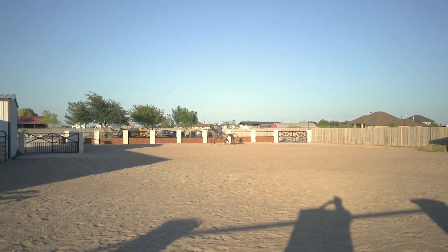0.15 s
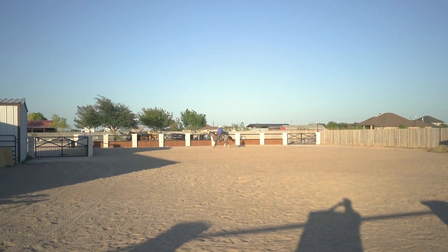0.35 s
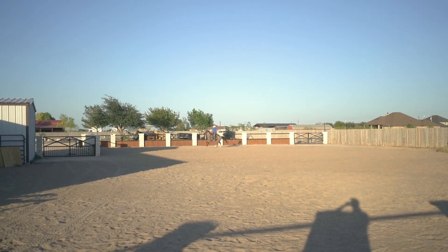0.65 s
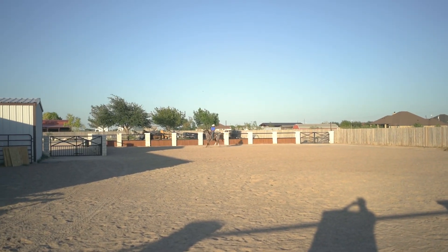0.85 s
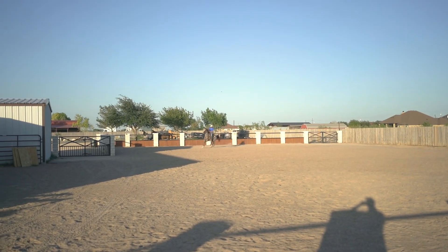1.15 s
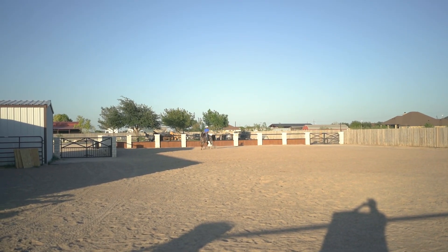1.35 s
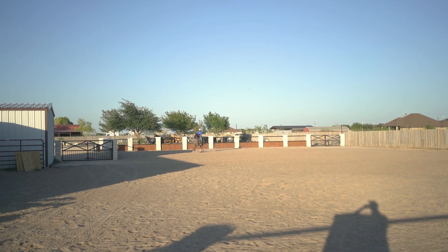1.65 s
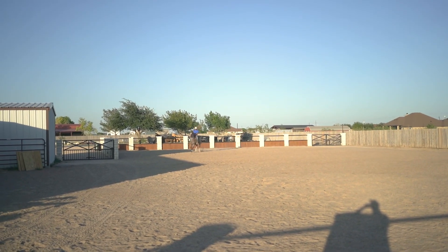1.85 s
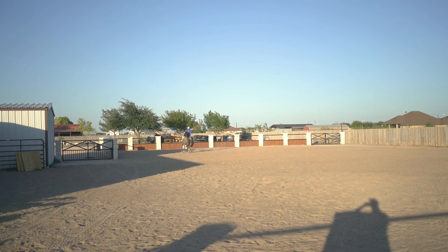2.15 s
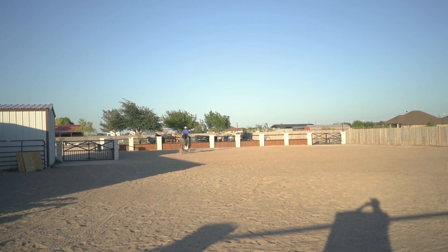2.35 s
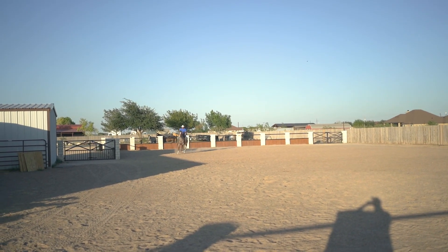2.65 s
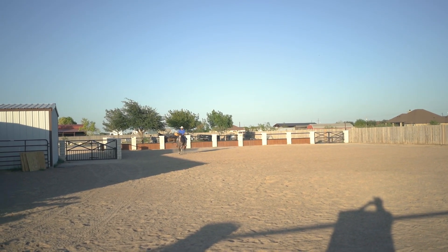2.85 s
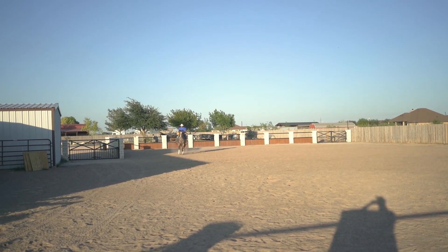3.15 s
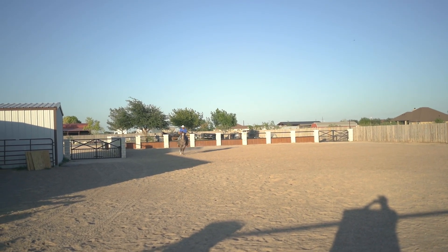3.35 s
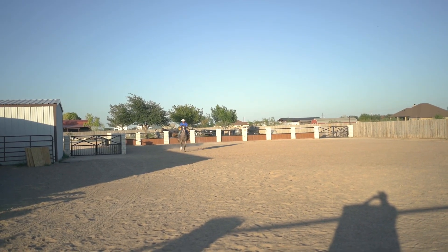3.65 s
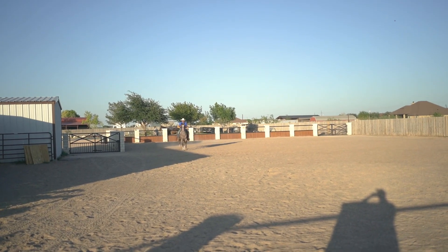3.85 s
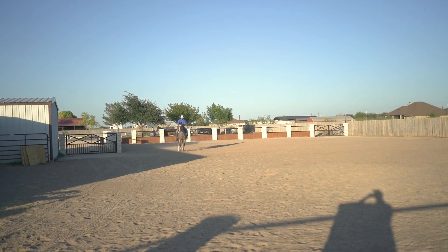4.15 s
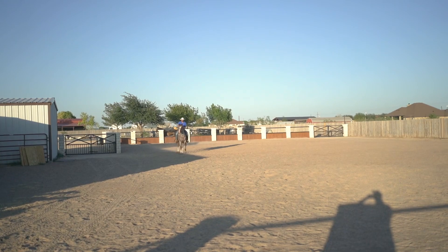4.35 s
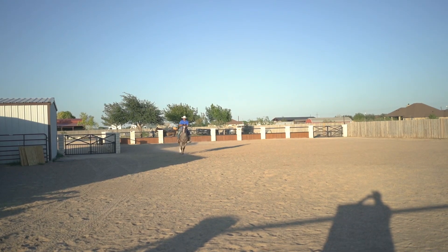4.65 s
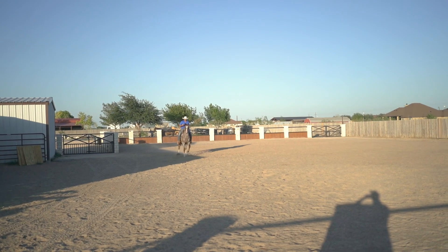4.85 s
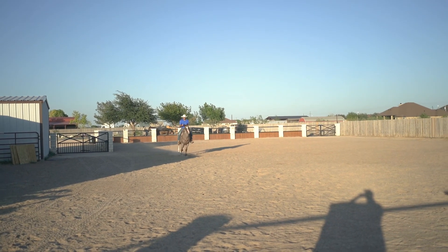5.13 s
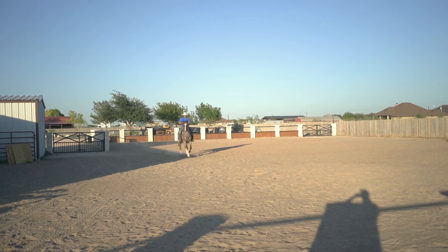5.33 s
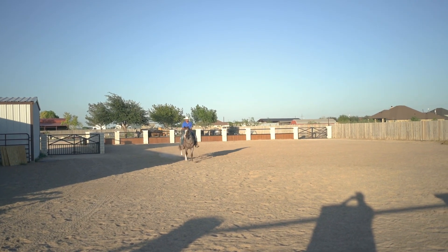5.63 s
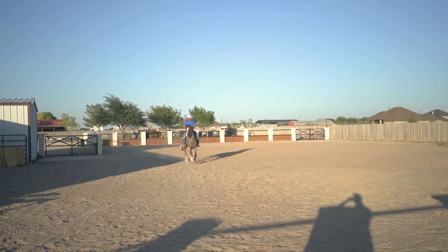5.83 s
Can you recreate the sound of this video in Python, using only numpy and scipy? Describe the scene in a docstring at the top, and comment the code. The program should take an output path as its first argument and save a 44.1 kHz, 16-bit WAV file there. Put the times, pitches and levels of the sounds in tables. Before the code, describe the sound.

Low wind buffets and moans at an outdoor microphone. A near horse starts with a hoarse grunt, rises into a piercing, shaky whinny, then adds a brief higher-pressure yelp and a weak puff of breath. After a windy pause a second horse farther off answers with a long throbbing neigh, high and low at once, sinking and fading. Short dull echoes follow the calls, with a few tiny dry ticks.

```python
"""Two horses calling in the wind

Wind buffets a microphone beside an open sand arena: shaped low noise, and a moan from a moving resonance.
A horse near by gives a long wavering whinny, a short one and a snort, built from unsteady tones and noisy breath.
A second horse answers from farther off with a high voice and a low one at once, and a thin strand between.
Sheds and fences return a short echo, made of fading noise. There is a faint outdoor hiss and a few dry ticks."""
import sys
import numpy as np
from scipy import signal
from scipy.fft import rfft, irfft
from scipy.io import wavfile
from scipy.ndimage import uniform_filter1d

SR = 44100
rng = np.random.default_rng(int(sys.argv[2]) if len(sys.argv) > 2 else 0)


def to_wav(s):
    """Save 16-bit WAV."""
    ch = np.atleast_2d(s).T  # columns
    pcm = np.round(np.clip(ch, -1, 1) * 32767)  # PCM
    wavfile.write(sys.argv[1], SR, pcm.astype(np.int16))


N = 264159  # length of the scene in samples, about 6 s

# how the far horse's throat colours its voices: (frequency [Hz], level [dB])
FAR_THROAT = [(250, -30), (500, -10.5), (760, -13.5), (1030, -10), (1450, 6), (1800, 0.5), (2150, -7.5),
              (2300, -12.5), (2420, -32.5), (2650, -10), (3000, -2.5), (3600, -9.5), (3780, -23.5),
              (4050, -12.5), (4350, -27.5), (4800, -28), (5300, -25.5), (6100, -30), (6500, -28),
              (7000, -30.5), (8300, -36), (15500, -47.5)]


def gain_of(db):
    """Turns decibels into a gain."""
    return 10 ** (np.asarray(db) / 20)


def evened(x):
    """Scales a sound to an average (rms) level of 1."""
    return x / np.sqrt(np.mean(x ** 2) + 1e-20)


def columns(rows):
    """Gives a gate that is open while the table lasts, then the table's columns at every sample."""
    s, *values = np.transpose(rows)
    t = np.arange(N) / SR
    gate = np.clip(np.minimum(t - s[0], s[-1] - t) / 0.017, 0, 1)  # fades over 17 ms at both ends
    return gate, *(np.interp(t, s, v) for v in values)


def wander(per_s, size=N):
    """A slow random curve of unit rms that changes about per_s times a second."""
    return evened(signal.lfilter(*signal.butter(2, per_s, fs=SR), rng.standard_normal(size)))


def colour(points, hz):
    """Reads the gain of a spectrum table at the frequencies hz."""
    f, db = np.transpose(points)
    return gain_of(np.interp(np.log(hz + 1), np.log(f + 1), db))


def coloured(points):
    """Noise of unit rms, shaped by a spectrum table."""
    spectrum = rfft(rng.standard_normal(N))
    return evened(irfft(spectrum * colour(points, np.fft.rfftfreq(N, 1 / SR)), N))


def band(x, low_hz, high_hz):
    """One frequency band of x, at unit rms."""
    return evened(signal.sosfilt(signal.butter(4, [low_hz, high_hz], "band", fs=SR, output="sos"), x))


def resonate(x, hz, width):
    """A moving resonance: shifts the curve hz down to zero, smooths, and shifts back."""
    turn = np.exp(2j * np.pi * np.cumsum(hz) / SR)
    r = np.exp(-np.pi * width / SR)
    return 2 * (turn * signal.lfilter([1 - r], [1, -r], x / turn)).real


def wind():
    """Lumpy low noise for the buffeting, and noise through a moving resonance for the moan."""
    # strength of the buffeting: (time [s], level [dB])
    gusts = [(0.0, -13), (0.4, -36.5), (0.42, -27.5), (0.97, -16), (1.03, -25), (1.5, -28.5), (1.65, -11),
             (1.7, -15), (1.77, -10), (1.82, -15.5), (2.12, -5), (2.74, -16), (2.75, -11.5), (3.57, -21.5),
             (3.74, -13.5), (3.77, -18), (4.45, -12.5), (4.82, -22), (5.2, -9.5), (5.25, -20.5),
             (5.32, -12.5), (5.65, -15), (5.67, -10), (5.99, -23.5)]
    # spectrum of the buffeting: (frequency [Hz], relative level [dB per Hz])
    rumble = [(7, -36.5), (15, -6), (45, -1.5), (75, -4), (110, -7), (160, -13.5), (220, -21), (320, -30.5),
              (450, -39), (700, -67.5), (1200, -89)]
    # the moan: (time [s], pitch [Hz], level before a cut of 3.5 dB [dB])
    moan_path = [(0, 198, -45.5), (.35, 202, -30), (.66, 215.6, -44.5), (.92, 180.6, -19),
                 (1.02, 210, -38.5), (1.5, 170, -48.5), (1.62, 222.5, -17), (1.8, 245, -33),
                 (2.07, 233, -18), (2.3, 298.4, -18.5), (2.5, 228, -15), (2.68, 208, -29),
                 (2.82, 200.4, -16), (2.94, 171, -28.5), (3.1, 184.7, -20), (3.45, 140.4, -19.5),
                 (3.6, 216.5, -21), (4.05, 187, -23.5), (4.24, 257, -25), (4.35, 188, -16),
                 (4.5, 262, -21.5), (4.62, 200, -25), (4.8, 177, -32.5), (4.97, 222, -19.5),
                 (5.22, 222, -29.5), (5.45, 299, -21.5), (5.6, 233.5, -22), (5.82, 245, -22),
                 (5.99, 214, -30)]
    buffet = gain_of(columns(gusts)[1] + 1.13 * wander(6.5)) * coloured(rumble)
    _, moan_hz, moan_db = columns(moan_path)
    moan_hz = moan_hz * (1 + 0.042 * wander(8))
    moan = resonate(resonate(rng.standard_normal(N), moan_hz, 38), moan_hz, 55)
    return buffet + gain_of(moan_db - 3.5 + 1.36 * wander(22.4)) * evened(moan)


def hiss():
    """The faint outdoor hiss: shaped noise, flickering a little."""
    # spectrum: (frequency [Hz], relative level [dB per Hz])
    spectrum = [(290, -6.5), (500, -4), (900, -11), (1200, -15.5), (1620, -19.5), (1820, -17), (2640, -19),
                (3380, -17), (4640, -26.5), (8000, -39.5), (11000, -41), (15800, -50.5)]
    # strength: (time [s], level [dB])
    strength = [(0, -42.5), (.3, -42.5), (1.5, -58), (1.7, -41.5), (2.6, -48.5), (3.3, -49.5), (5.8, -41.5),
                (5.99, -44)]
    flicker_db = 1.3 * wander(9)
    return gain_of(columns(strength)[1] + flicker_db) * coloured(spectrum)


def trill():
    """The near horse's trill: pitch sag and loss of breath at every sample, one smooth dip for each sag."""
    # each time the voice sags and the breath is choked:
    # (time [s], sag [Hz], half length [s], treble lost [dB])
    sags = [(0.588, 69.4, .04, 7), (0.676, 100.1, 0.034, 1), (0.794, 161, .03, 1.5), (0.899, 109.4, .05, 5),
            (0.999, 189.4, 0.054, 6.5), (1.142, 435.6, 0.061, 21), (1.25, 200.2, .05, 12),
            (1.357, 354.4, 0.052, -1), (1.957, 126.8, .04, -1), (1.986, 62, .025, 8.5)]
    s, sag_hz, half, lost_db = np.transpose(sags)
    t = np.arange(N)[:, None] / SR
    dip = np.cos(np.pi / 2 * np.clip((t - s) / half, -1, 1)) ** 2
    return dip @ sag_hz, dip @ lost_db


def whinny(rows, voice, throat, jitter, tremble, shimmer_db, patchy_db):
    """An unsteady tone with overtones and half-pitch lines, and breath rushing through the throat."""
    # upper overtones: (multiple of the pitch, level against the treble [dB])
    upper = [(3, -6.5), (4, -14.5), (5, -30), (6, -30.5)]
    # odd halves, heard when every second cycle differs: (multiple of the pitch, relative level [dB])
    halves = [(.5, -30), (1.5, -2), (2.5, -6.5), (3.5, -17), (4.5, -40.5)]
    loud_db, soft_db = -20, -34  # tone levels between which the roughness changes
    choke_share = 0.3  # part of the lost treble dB that the lower breath loses too
    halves_lag_s, halves_flat = .16, 0.99  # half-pitch lines follow the pitch sluggishly, a little flat
    hoarse_db, hoarse_width_hz = -0.5, 700  # a wide rasp around the pitch, strongest in a rough voice

    gate, *controls = columns(rows)
    on = gate > 0
    hz, tone_db, breath_db, treble_db, half_db, sag_hz, lost_db = (c[on] for c in (*controls, *trill()))
    octave_db, low_db, rough_loud, rough_soft = voice
    size = len(hz)
    loud = np.clip((tone_db - soft_db) / (loud_db - soft_db), 0, 1)
    rough = np.clip(rough_soft + (rough_loud - rough_soft) * loud, 0, 1)

    hz = hz - sag_hz
    treble_db = treble_db - lost_db
    breath_db = breath_db - choke_share * lost_db
    half_db = half_db - lost_db

    slow_hz = halves_flat * uniform_filter1d(hz, size=round(halves_lag_s * SR))
    slow_turn = 2 * np.pi * np.cumsum(slow_hz * (1 + 2.2 * jitter * wander(45, size))) / SR
    unsteady = 1 + jitter * wander(115.6, size) + tremble * wander(11.73, size)
    turn = 2 * np.pi * np.cumsum(hz * unsteady) / SR

    def line(multiple, db, tear, swing_db, per_s, turn=turn):
        """One partial; uneven closing of the vocal folds tears a share of it into a rasp of sidebands."""
        spread_hz = 70 + 40 * multiple  # higher partials tear wider
        rasp = wander(spread_hz, size) * np.sin(multiple * turn)
        rasp += wander(spread_hz, size) * np.cos(multiple * turn)
        clean = np.sqrt(2) * np.sin(multiple * turn)
        level = gain_of(db + swing_db * wander(per_s, size))
        return level * (np.sqrt(1 - tear) * clean + np.sqrt(tear) * rasp)

    tone = line(1, tone_db, rough ** 3, shimmer_db, 70)
    hoarse = resonate(rng.standard_normal(size), hz, hoarse_width_hz)
    hoarse = evened(resonate(hoarse, hz, hoarse_width_hz))
    tone += gain_of(tone_db + hoarse_db) * rough ** 2.56 * hoarse
    octave = line(2, tone_db + octave_db, rough ** 1.8, 0.75 * shimmer_db, 29)
    tone += colour(throat, 2 * hz) * octave
    for k, db in upper:
        tone += line(k, treble_db + db, np.sqrt(rough), patchy_db, 8.7)
    for k, db in halves:
        tone += line(k, half_db + db, rough ** 1.8, 0.55 * patchy_db, 20, slow_turn)

    rush = coloured(throat)[on]
    breath = gain_of(breath_db + low_db) * band(rush, 270, 1394)
    breath += gain_of(breath_db - 2.5) * band(rush, 1760, 4920)
    breath += gain_of(treble_db - 6.0) * band(rush, 5410, 17000)
    out = np.zeros(N)
    out[on] = tone + gain_of(1.3 * wander(40, size)) * breath
    return gate * out


def grunt(start, length, first_hz, last_hz, peak_db):
    """A short hoarse low note: an unsteady pitch with a few overtones, loudest in the middle."""
    ends_db = peak_db - 4
    gate, hz, level_db = columns([(start, first_hz, ends_db),
                                  (start + length / 2, (first_hz + last_hz) / 2, peak_db),
                                  (start + length, last_hz, ends_db)])
    turn = 2 * np.pi * np.cumsum(hz * (1 + .04 * wander(103))) / SR
    return gate * gain_of(level_db) * sum(gain_of(-3.5 * k) * np.sin((k + 1) * turn) for k in range(5))


def near_horse():
    """A long whinny, a short one and a snort share one throat; low grunts open and close the long whinny."""
    # the three calls, each: (time [s], pitch before sags [Hz], tone [dB], breath before sags [dB],
    # treble before sags [dB], half-pitch lines before sags [dB])
    squeal = [(.28, 1089, -63, -47, -81, -74), (.334, 1095, -50, -43, -47.5, -51),
              (.444, 1690, -28, -28, -45, -62), (.534, 1892, -33.5, -25, -42, -31.5),
              (.64, 2017, -26.5, -30, -30.5, -18.5), (.83, 2066, -22.5, -22, -24, -19.5),
              (.94, 2008, -22.5, -24, -29.5, -25), (1.06, 1993, -26, -23.5, -29.5, -27.5),
              (1.2, 2027, -27, -25.5, -28.5, -23.5), (1.31, 2060, -23, -22.5, -26, -35),
              (1.4, 1942, -21.5, -24, -42, -35), (1.44, 1795, -23.5, -18.5, -31.5, -26),
              (1.52, 1540, -74, -29.5, -54, -64)]
    yelp = [(1.715, 993, -55, -55, -77, -75), (1.74, 1143, -37, -44, -44, -69),
            (1.795, 1550, -28, -32, -44.5, -44), (1.82, 1670, -19, -18.5, -33.5, -41),
            (1.86, 1744, -16.5, -23.5, -35, -46.5), (1.9, 1866, -19, -27, -32, -49),
            (2.03, 1869, -18.5, -25.5, -41.5, -53), (2.05, 1640, -30.5, -17, -36, -39),
            (2.07, 1390, -42.5, -26.5, -43.5, -60), (2.1, 1220, -55, -39, -45.5, -68)]
    snort = [(2.32, 1794, -58, -46.5, -70, -71), (2.378, 1810, -72, -39, -43.5, -71),
             (2.424, 1795, -58, -48, -51, -71), (2.55, 1760, -64, -56.5, -70, -75)]
    # how the throat colours the voice: (frequency [Hz], level [dB])
    near_throat = [(250, -30.5), (600, -25.5), (1200, -17), (1900, -8), (2450, -10.5), (2900, 0),
                   (3400, 1.5), (3900, -2), (4500, -14), (4900, -29), (5300, -15), (5900, -15.5),
                   (8200, -26.5), (9000, -34.5), (9900, -31.5), (15500, -50)]
    # (start [s], length [s], first pitch [Hz], last pitch [Hz], peak level of the lowest tone [dB])
    grunts = [(0.303, 0.125, 561, 614, -33.5), (1.43, 0.074, 337, 185.3, -32.5)]
    # voice: octave above tone before the throat [dB], low breath above breath [dB],
    # roughness 0-1 when loud, when soft
    calls = (squeal, (0, -15, .4, 1)), (yelp, (-5, -12, .55, 1)), (snort, (0.9, -0.68, .9, 1))
    near = sum(whinny(*call, near_throat, jitter=0.0104, tremble=0.00349, shimmer_db=2.68, patchy_db=2.45)
               for call in calls)
    return near + sum(grunt(*row) for row in grunts)


def echo(x, t60=0.87, delay=.03, top_hz=5000):
    """Scattered returns from sheds and fences: a dull dying tail of noise with unit energy."""
    t = np.arange(SR) / SR
    tail = rng.standard_normal(SR) * gain_of(-60 * t / t60) * (t > delay)
    tail = signal.lfilter(*signal.butter(1, top_hz, fs=SR), tail)
    return signal.fftconvolve(x, tail / np.linalg.norm(tail))[:N]


def ticks():
    """Short dry crackles close to the microphone: resonant noise that dies at once."""
    # (time [s], peak level [dB], frequency [Hz])
    tick_rows = [(2.33, -43, 5520), (2.7504, -50, 5630), (2.91, -47, 5760), (3.112, -44, 6540),
                 (3.3786, -47, 5520), (3.4575, -43.5, 6260), (4.4992, -34, 5910), (4.7123, -36, 5940),
                 (5.811, -33.5, 8830), (5.9124, -48, 6470), (5.9289, -44, 5510), (5.979, -41, 9060)]
    t60_s = 0.029  # time to fade by 60 dB
    size = 3000
    out, t = np.zeros(N + size), np.arange(size) / SR
    for s, db, hz in tick_rows:
        burst = resonate(rng.standard_normal(size), np.full(size, hz), 5000) * gain_of(-60 * t / t60_s)
        out[round(s * SR):][:size] += gain_of(db) * burst / abs(burst).max()
    return out[:N]


def nicker():
    """A low voice kicked upward at each throb that slides back; the throat colours its overtones."""
    # (time [s], resting pitch [Hz], level before the kicks thin it [dB])
    low_voice = [(3.3, 647, -71), (3.45, 704, -46), (3.74, 599, -58), (3.78, 602.5, -37),
                 (3.9, 585.7, -28.5), (3.98, 514, -29), (4.7, 428.2, -31.5), (5.2, 370.5, -30.5),
                 (5.4, 367.1, -41), (5.6, 371.7, -40), (5.72, 362, -55)]
    a_throb_s, throbs_per_s = 3.785, 8.2  # start of one throb, and the steady rate
    kick_top_hz, kick_least_hz, kick_most_hz = 637.4, 50, 170.2  # kicks aim at the same top, within limits
    kick_loss_db_per_khz = 17  # the voice thins as it is kicked up
    overtones_db, overtones_from_s = -8, 3.94  # against the main tone; they swell from this time

    gate, rest_hz, level_db = columns(low_voice)
    t = np.arange(N) / SR
    since = (t - a_throb_s) % (1 / throbs_per_s)
    kick = uniform_filter1d(np.exp(-abs(since / 0.05) ** 3), size=300)
    kick_hz = np.clip(kick_top_hz - rest_hz, kick_least_hz, kick_most_hz)
    rest_hz = rest_hz * (1 + .045 * wander(65.7))
    hz = rest_hz + kick_hz * kick
    turn = 2 * np.pi * np.cumsum(hz) / SR
    # the resting pitch lingers under each kick
    drone = gain_of(-10.5) * kick * np.sin(2 * np.pi * np.cumsum(rest_hz) / SR)
    overtones = sum(colour(FAR_THROAT, k * hz) * np.sin(k * turn) for k in range(2, 11))
    opened = np.clip((t - overtones_from_s) / 0.08, .1, 1)
    voice = np.sin(turn) + drone + gain_of(overtones_db) * opened * overtones
    thinned_db = level_db - kick_loss_db_per_khz * kick_hz * kick / 1000
    return gate * np.sqrt(2) * gain_of(thinned_db + 1.75 * wander(25)) * voice


def strand():
    """A thin tone that comes and goes, its pitch and level wavering by chance."""
    # (time [s], pitch [Hz], level [dB])
    thin_voice = [(3.49, 1113, -59), (3.55, 1029, -38), (3.68, 1004, -43.5), (3.76, 1187, -35.5),
                  (4.1, 1036, -34), (4.49, 1017, -41.5), (5.06, 1029, -49), (5.27, 1039, -40),
                  (5.38, 1185, -33.5), (5.5, 1140, -34.5), (5.62, 1055, -40), (5.68, 1007, -52)]
    gate, hz, level_db = columns(thin_voice)
    turn = 2 * np.pi * np.cumsum(hz * (1 + .04 * wander(18) + 0.02144 * wander(75.0))) / SR
    return gate * np.sqrt(2) * gain_of(level_db + 3.0 * wander(14)) * np.sin(turn)


def far_horse():
    """The low voice shakes the high one, which weaves wavering lines at their sum and difference."""
    # high voice: (time [s], pitch [Hz], tone [dB], breath [dB], treble [dB], half-pitch lines [dB])
    answer = [(3.4, 1330, -62, -49.5, -60, -67), (3.53, 1322, -50, -44.5, -61, -63),
              (3.58, 1338, -33.5, -61, -62, -47), (3.69, 1357, -30, -41, -52.5, -50.5),
              (3.72, 1378, -24.5, -37, -52, -53.5), (3.87, 1454, -16, -28, -48, -32.5),
              (4.01, 1548, -20.5, -24, -43.5, -56.5), (4.07, 1476, -21, -22.5, -48, -60),
              (4.17, 1491, -19, -22.5, -45, -52), (4.33, 1459, -18, -26, -47, -50),
              (4.47, 1498, -19, -24.5, -47, -51), (4.75, 1428, -26, -27.5, -49, -56),
              (5.12, 1319, -33, -28.5, -50, -65), (5.33, 1240, -41.5, -33.5, -51.5, -64),
              (5.38, 1485, -34.5, -35, -51, -64), (5.52, 1490, -41, -37, -55, -53),
              (5.65, 1560, -35.5, -38, -57, -67), (5.69, 1505, -56, -46, -58, -67),
              (5.76, 1523, -56, -56, -61, -67)]
    voice = (-10.5, -11.5, 0.45, 0.67)  # octave [dB], low breath [dB], roughness when loud, when soft
    low = nicker()
    high = whinny(answer, voice, FAR_THROAT, jitter=0.0144, tremble=.015, shimmer_db=1.6, patchy_db=2.2)
    return high * (1 + 1.34 * low) + low + strand()


def scene():
    """Two horses with their echo, wind, hiss and ticks."""
    near, far = near_horse(), far_horse()
    horses = near + far + gain_of(-18) * echo(near) + gain_of(-13) * echo(far, t60=0.35)
    return (horses + wind() + hiss() + ticks())[None]


def record(dry):
    """Rounds off the loudest peaks near full scale, then removes the highest treble."""
    edge_hz = 15800
    held = dry / (1 + dry ** 4) ** (1 / 4)
    low_pass = signal.firwin(1023, edge_hz, window=("kaiser", 10), fs=SR)
    return signal.oaconvolve(held, low_pass[None], "same")


dry = scene()
out = record(dry)
to_wav(out)
```